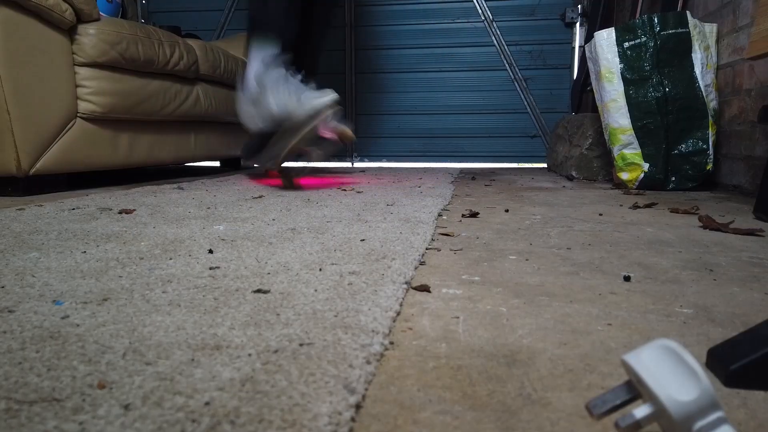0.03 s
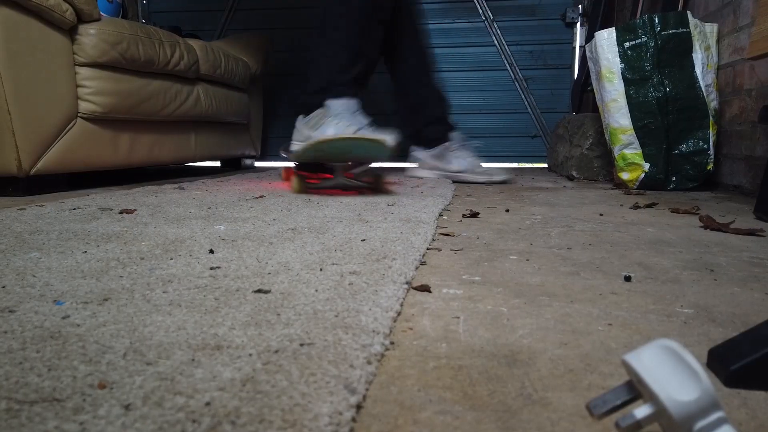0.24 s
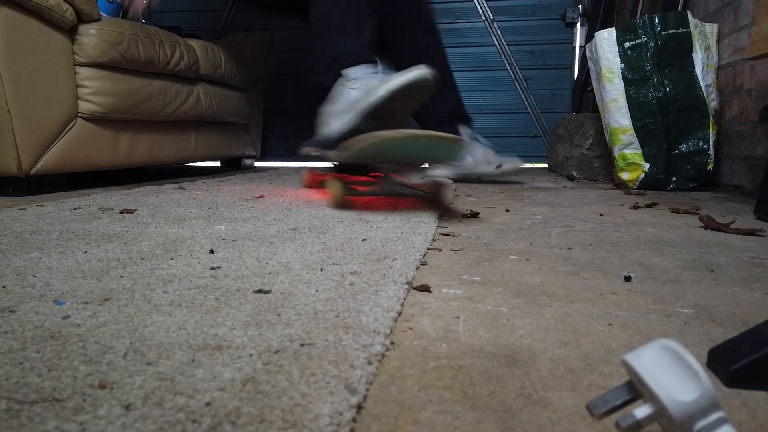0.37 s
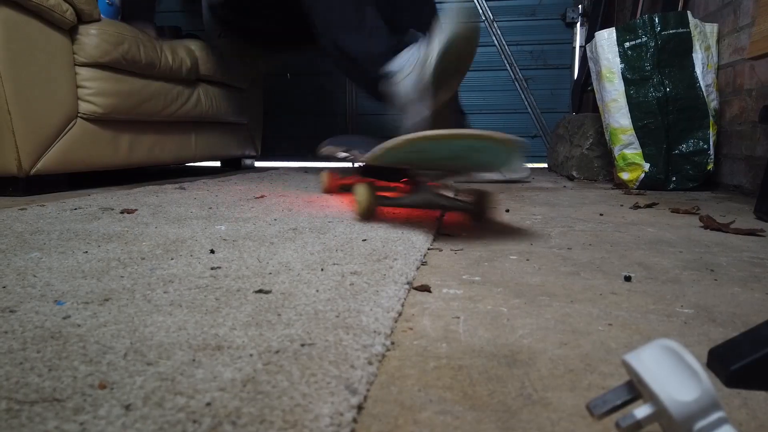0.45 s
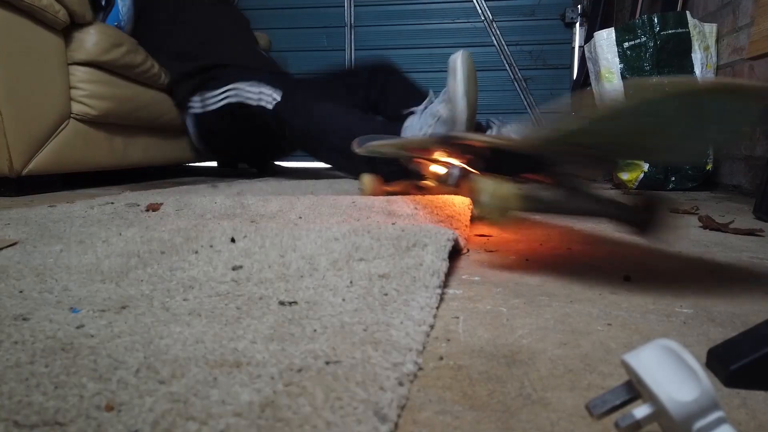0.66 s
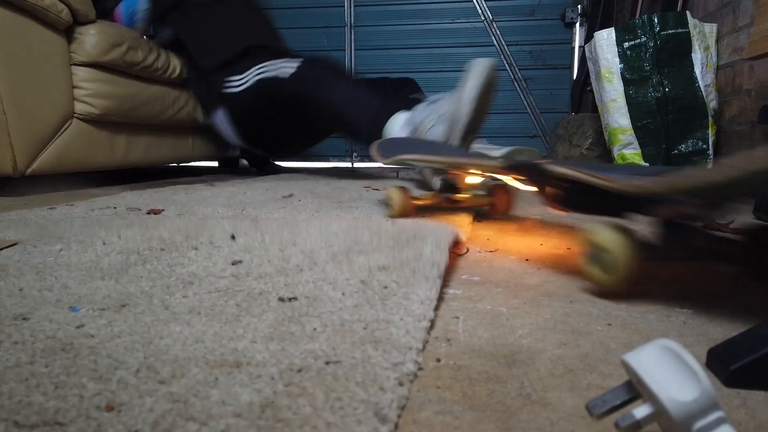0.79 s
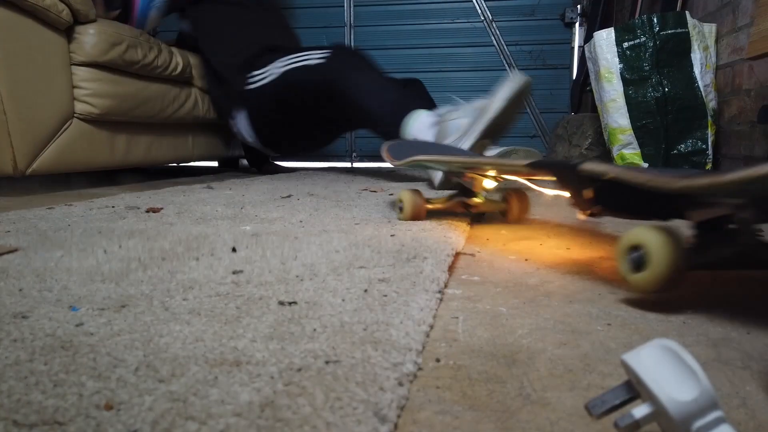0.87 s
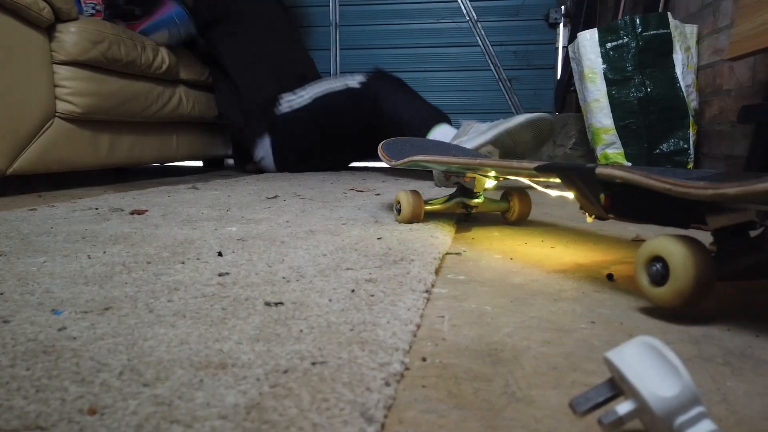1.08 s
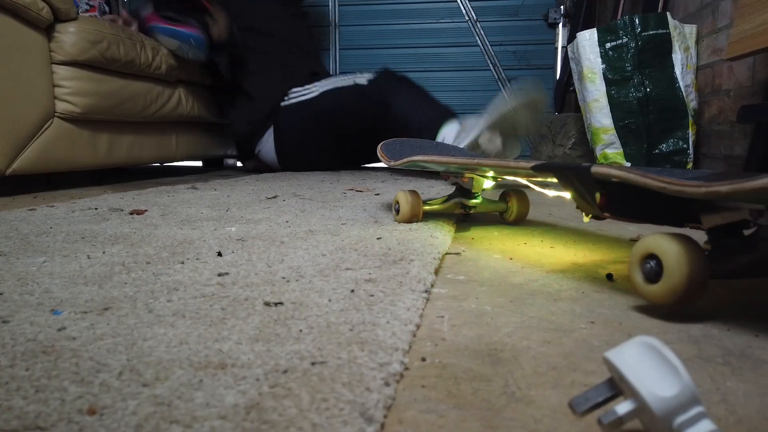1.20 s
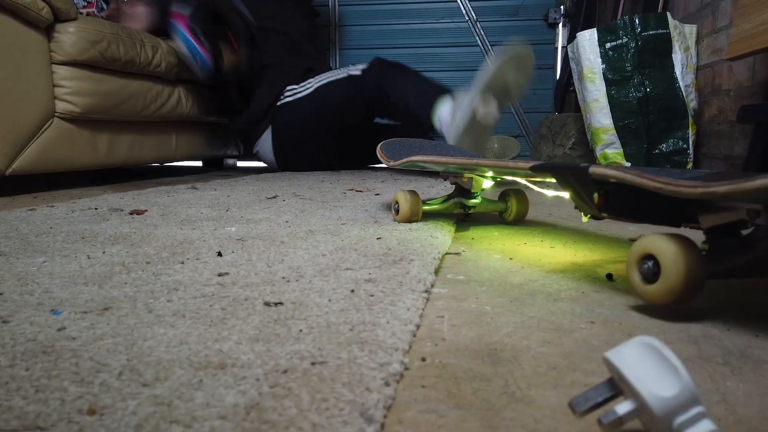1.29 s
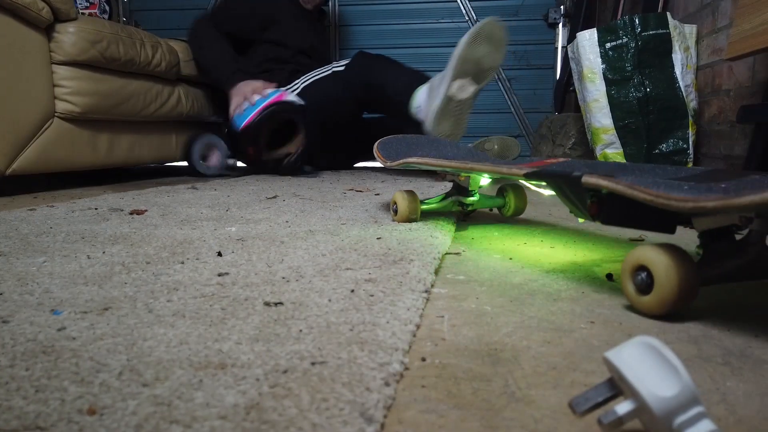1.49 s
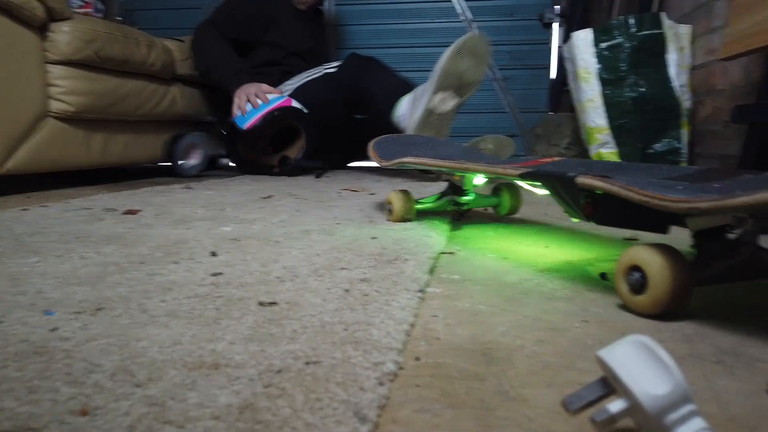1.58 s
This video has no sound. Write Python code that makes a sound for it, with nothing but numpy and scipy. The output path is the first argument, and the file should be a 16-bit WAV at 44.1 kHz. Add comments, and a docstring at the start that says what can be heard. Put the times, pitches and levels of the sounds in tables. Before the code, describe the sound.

A skateboard clacks down on a garage floor, then rolls closer with thumps and crunching grit.

```python
"""A skateboard at the far end of a small garage. The echo of its take-off pop dies away. From 0.2 s
its two ends clack down, ringing the deck, and it shoots out from under the rider. It rumbles and
swishes closer over a strip of carpet, with more knocks and dull thumps as rider and board come down.
At 1.03 s the wheels drop onto concrete and crush grit. By 1.6 s the board slows to a stop,
its deck still humming."""
import sys
import numpy as np
from scipy import signal
from scipy.fft import rfft, irfft
from scipy.io import wavfile

SR = 44100
rng = np.random.default_rng(int(sys.argv[2]) if len(sys.argv) > 2 else 0)


def generate_wav(signal):
    """Clip the signal to [-1, 1] and save it as 16-bit WAV at the path in sys.argv[1]."""
    frames = np.transpose(np.atleast_2d(signal))
    scaled = np.clip(frames, -1, 1) * 32767
    pcm = np.round(scaled).astype(np.int16)
    wavfile.write(sys.argv[1], SR, pcm)


N = 72765

# Blows on board and floor. Each row: start in seconds, wooden knock in dB, hard crack in dB.
BLOWS = [(.2035, -15.5, -18), (0.2248, 3, 2), (.2435, -5.5, -4.5), (.261, -31, -7.5), (.3205, -1.5, -5),
         (.332, 0.5, -3.5), (.348, -3, -31), (.372, -8.5, -34), (.626, -18, -25.5), (.643, -16, -19.5),
         (.785, -18.5, -17), (.801, -17.5, -25), (.866, -23.5, -46), (.9315, -11.5, -12), (.9495, -9, -31),
         (.98, -19.5, -29)]
# Single contacts. Each row: start in seconds, relative level in dB.
GRIT_SNAPS = [(0.932, -12.5), (0.9363, -10.5), (1.032, -11), (1.041, 1.5), (1.064, -6), (1.07, 1),
              (1.082, 0), (1.11, -4), (1.1184, -3.5), (1.1382, -6.5), (1.170, -7), (1.2705, -16.5)]
FLOOR_THUMPS = [(0.233, -5), (0.779, -8), (0.837, -6.5), (0.881, 1), (.935, -4), (0.976, -6), (1.095, -2.5),
                (1.128, -18)]

# Modes. Each row: frequency in Hz, relative level in dB, T60 in seconds.
BEND_MODES = [(522, -2, 0.014), (642.5, 0, 0.039), (777, -2.5, 0.025), (1450, 2, 0.005)]   # deck damped by feet and floor
DECK_MODES = [(247, -17, 0.43), (284, -6, 0.083), (333, -3, 0.053), (475.7, -14, 0.32),
              (545.7, -15.5, 0.43), (567.4, -2.5, 0.21), (627.6, 4, 0.096), (729.5, -11, 0.13),
              (768, -34, 0.41), (837, -1, 0.079), (1054, -43, 0.18), (1322, -25, 0.05), (1451, -13, 0.056)]
HUM_MODES = [(116.5, -44, 2.33), (324, -44, 1.4), (461, -50, 1.2), (482.2, -25.5, 0.26), (1427, -44, .35),
             (1600, -35, .3)]   # unloaded board
FLOOR_MODES = [(53, -5.5, 0.2), (87.6, 4, 0.079), (150, -8, 0.11)]
# Resonances of the rolling board. Each row: frequency in Hz, bandwidth in Hz, relative level in dB.
ROLL_MODES = [(123, 2.7, -19), (158, 26, -7), (246, 11.7, -9), (352.6, 10.3, 0.5), (378, 55, -5.5),
              (439.2, 10, -0.5), (491.7, 16, 1.5), (565, 25, -9), (671, 65, -11.5), (745, 64, -13.5),
              (877, 51, -11)]

# Envelopes. Each row: time in seconds, level in dB.
CRUNCH_ENVELOPE = [(1.02, -77), (1.034, -31.5), (1.058, -33.5), (1.075, -26.5), (1.098, -35), (1.125, -34),
                   (1.145, -38), (1.165, -58), (1.25, -74), (1.28, -49), (1.31, -59.5), (1.49, -72.5),
                   (1.6, -108)]
ROLL_ENVELOPE = [(.36, -31), (.5, -56), (.61, -61), (.72, -44), (.8, -52), (.92, -52), (1.02, -51),
                 (1.06, -41.5), (1.12, -36), (1.17, -38.5), (1.28, -39.5), (1.34, -48.5), (1.48, -57),
                 (1.65, -66)]
RUMBLE_ENVELOPE = [(0.0, -69), (0.17, -102), (0.21, -42.5), (0.248, -41), (0.514, -53), (0.56, -61.5),
                   (0.602, -94), (0.628, -72), (0.758, -49.5), (0.784, -55), (0.872, -35), (0.886, -38),
                   (1.02, -46), (1.088, -39), (1.13, -31.5), (1.152, -41.5), (1.604, -65), (1.65, -63)]
SWISH_ENVELOPE = [(.4, -110), (.52, -56.5), (.71, -57.5), (.76, -41), (.80, -41), (.85, -45), (.9, -55),
                  (.96, -54), (1.03, -51), (1.2, -71.5), (1.48, -64), (1.56, -69.5), (1.62, -100)]

# Spectra. Each row: frequency in Hz, gain in dB.
CRACK_SPECTRUM = [(20, -16), (45, -17), (90, 1), (200, 4.5), (400, 6.5), (800, 3.5), (1030, 3.5),
                  (1400, 0.5), (2000, -7.5), (3200, -8), (5000, -18.5), (8000, -18), (12000, -20),
                  (16000, -26)]
GRIT_SPECTRUM = [(100, -16), (300, -2.5), (480, 5.5), (700, 4.5), (1000, 1.5), (1500, 8), (2100, -5),
                 (2700, 1), (3500, -1), (4000, -11), (4600, -5.5), (5300, -16.5), (8000, -12.5),
                 (11000, -15.5), (16000, -43)]
SNAP_SPECTRUM = [(100, -6.5), (400, 5.5), (1000, 3), (1600, 8.5), (2700, 3.5), (4500, -5.5), (5600, -13),
                 (8000, -13.5), (11000, -11), (16000, -21)]
RUMBLE_SPECTRUM = [(15, -4), (30, -8), (53, -1.5), (70, -3.5), (92, -8.5), (125, -6), (200, -14),
                   (400, -18.5), (1000, -86)]
CARPET_SPECTRUM = [(150, -8.5), (600, 8.5), (1100, 3), (1700, 0), (3200, -3), (5500, -15.5), (9000, -15.5),
                   (12000, -19.5), (16000, -33)]
AIR_SPECTRUM = [(20, -11), (65, -8.5), (150, -15), (350, -16.5), (650, -22), (2000, -26), (6000, -35.5),
                (16000, -26)]
SIDE_SPECTRUM = [(60, -55), (250, -53), (450, -42.5), (700, -17), (1000, -19), (2000, -8), (4000, -8.5),
                 (8000, -1.5), (14000, -2)]   # stereo side relative to mid

# Garage decay. Each row: frequency in Hz, T60 in seconds.
GARAGE_T60 = [(60, 1), (250, 0.37), (600, 0.3), (1500, 0.73), (3000, 0.55), (6000, 0.52), (14000, 0.27)]


def blows(garage, contact_hz=970, wood_cutoff_hz=1630, mode_spread_db=1.5):
    """Each blow bends the deck, rings its modes and cracks on the hard floor."""
    start_s, knock_db, crack_db = np.transpose(BLOWS)
    push = np.gradient(lowpass(clicks(start_s, knock_db), contact_hz)) * SR / (2 * np.pi)
    clack = amp(-15.5) * sum((-1) ** k * amp(db) * ring(push / hz, hz, t60_s)
                             for k, (hz, db, t60_s) in enumerate(BEND_MODES))
    shape = (len(BLOWS), len(DECK_MODES))
    strengths = amp(rng.normal(0, mode_spread_db, shape)) * rng.choice([-1, 1], shape)
    deck = amp(-23.5) * sum(ring(clicks(start_s, knock_db + db, strengths[:, k]), hz, t60_s)
                            for k, (hz, db, t60_s) in enumerate(DECK_MODES))
    hits = clicks(start_s, crack_db + 5.5)
    crack, crack_side = [colour(bursts(hits, taus_s=(0.0025, 0.0046)), CRACK_SPECTRUM) for _ in range(2)]
    direct = clack + lowpass(deck, wood_cutoff_hz) + amp(-2) * stereo(crack, crack_side)
    return direct + reverb(amp(3.5) * crack + amp(-2) * clack, garage)


def grit(grains_per_s=5000, spread_db=3.5):
    """Wheels crush dense small grains; a few snap loudly."""
    sizes = amp(spread_db * np.minimum(rng.exponential(1, N), 4)) * rng.choice([-1, 1], N)
    crushed = rng.random(N) < grains_per_s / SR
    grains = unit_rms(colour(sizes * crushed, GRIT_SPECTRUM))
    snaps = bursts(clicks(*np.transpose(GRIT_SNAPS)), taus_s=(0.0012, 0.0046))
    return envelope(CRUNCH_ENVELOPE) * grains + amp(1.5) * colour(snaps, SNAP_SPECTRUM)


def rolling():
    """The uneven floor rumbles and shakes the board through the wheels."""
    bumps = rng.standard_normal(N)
    board = sum((-1) ** k * amp(db) * width_hz * ring(bumps, hz, np.log(1000) / (np.pi * width_hz))
                for k, (hz, width_hz, db) in enumerate(ROLL_MODES))
    rumble = amp(1) * envelope(RUMBLE_ENVELOPE) * noise(RUMBLE_SPECTRUM)
    return envelope(ROLL_ENVELOPE) * unit_rms(board) + rumble


def thumps(contact_hz=162):
    """Rider and board come down: soft heavy blows boom in the floor."""
    push = lowpass(clicks(*np.transpose(FLOOR_THUMPS)), contact_hz)
    return amp(-29) * sum(amp(db) * ring(push, hz, t60_s) for hz, db, t60_s in FLOOR_MODES)


def deck_hum(drop_s=1.032):
    """The wheels drop off the carpet's edge; the unloaded board rings on."""
    return sum(ring(clicks([drop_s], db), hz, t60_s) for hz, db, t60_s in HUM_MODES)


def carpet_swish():
    """The echo of the take-off pop dies away, then wheels and clothes swish over the carpet."""
    pop_tail = amp(-57.5) * decay(t60_s=0.31)
    return (pop_tail + envelope(SWISH_ENVELOPE)) * stereo(noise(CARPET_SPECTRUM), noise(CARPET_SPECTRUM))


def garage_response(build_s=0.00067):
    """Early wall reflections and a tail dying band by band; mid and side, unit energy."""
    edges_hz = np.geomspace(30, 19000, 14)
    white = rng.standard_normal((2, 2, N))
    early = amp(0.5) * decay(t60_s=0.087)
    response = 0
    for k, band_hz in enumerate(zip(edges_hz, edges_hz[1:])):
        bandpass = signal.butter(2, band_hz, "band", fs=SR, output="sos")
        tail = decay(at_hz(GARAGE_T60, np.sqrt(np.prod(band_hz))))
        response = response + signal.sosfilt(bandpass, white[k % 2]) * (early + tail)
    onset = 1 - np.exp(-np.arange(N) / SR / build_s)
    return unit_rms(response * onset) / np.sqrt(N)


def reverb(x, garage):
    """Stereo garage reflections of x."""
    return stereo(*[signal.fftconvolve(x, response)[:N] for response in garage])


def garage_air():
    """Faint steady room noise."""
    return amp(-72) * stereo(noise(AIR_SPECTRUM), noise(AIR_SPECTRUM))


def amp(db):
    """Decibels to gain."""
    return 10 ** (np.asarray(db) / 20)


def unit_rms(x):
    """Scale to rms 1."""
    return x / np.sqrt(np.mean(x ** 2) + 1e-20)


def envelope(rows):
    """Gain over time; silent before the first row."""
    time_s, db = np.transpose(rows)
    return amp(np.interp(np.arange(N) / SR, time_s, db, left=-np.inf))


def decay(t60_s):
    """Gain falling 60 dB per T60."""
    return amp(-60 * np.arange(N) / SR / t60_s)


def at_hz(rows, hz):
    """Interpolate on a log-frequency axis."""
    row_hz, values = np.transpose(rows)
    return np.interp(np.log(np.maximum(hz, 1)), np.log(row_hz), values)


def colour(x, spectrum, size=16384):
    """Minimum-phase filter with the given spectrum."""
    bins_hz = np.arange(size // 2 + 1) * SR / size
    cepstrum = irfft(np.log(amp(at_hz(spectrum, bins_hz))))
    cepstrum[1:size // 2] *= 2
    cepstrum[size // 2 + 1:] = 0
    return signal.fftconvolve(x, irfft(np.exp(rfft(cepstrum))))[:N]


def lowpass(x, hz):
    """Second-order low-pass; spreads a click in time."""
    return signal.sosfilt(signal.butter(2, hz, fs=SR, output="sos"), x + 1e-18)


def noise(spectrum):
    """Coloured noise, rms 1."""
    return unit_rms(colour(rng.standard_normal(N), spectrum))


def stereo(mid, side):
    """Left and right: alike in the bass, apart in the treble."""
    return mid + colour(side, SIDE_SPECTRUM) * np.array([[1], [-1]])


def clicks(start_s, db, gain=1):
    """One impulse per contact."""
    impulses = np.zeros(N)
    np.add.at(impulses, (np.asarray(start_s) * SR).astype(int), amp(db) * gain)
    return impulses


def ring(x, hz, t60_s):
    """One mode: a unit click starts a decaying sine of height 1."""
    radius, angle = amp(-60 / (t60_s * SR)), 2 * np.pi * hz / SR
    return signal.lfilter([0, np.sin(angle)], [1, -2 * radius * np.cos(angle), radius ** 2], x + 1e-18)


def bursts(x, taus_s):
    """Each click becomes a noise burst of equal energy, shaped by two time constants."""
    power = x ** 2 + 1e-18
    for pole in np.exp(-2 / (np.array(taus_s) * SR)):
        power = signal.lfilter([1 - pole], [1, -pole], power)
    return np.sqrt(power) * rng.standard_normal(N)


def scene():
    """Far blows, near wheels and carpet swish over the garage air."""
    garage, crunch, air = garage_response(), grit(), garage_air()
    # Close and straight ahead, the grit sounds narrow.
    wheels = stereo(crunch + rolling(), amp(-5.5) * grit() + rolling())
    wheels += amp(-9.5) * reverb(crunch, garage)
    return blows(garage) + wheels + thumps() + deck_hum() + carpet_swish() + air


def record(dry):
    """Steep low-pass at 16 kHz."""
    return signal.sosfilt(signal.ellip(10, .2, 80, 16000, fs=SR, output="sos"), dry)


dry = scene()
out = record(dry)
generate_wav(out)
```